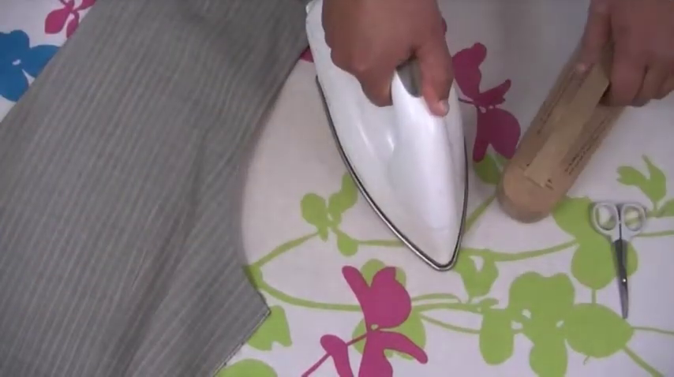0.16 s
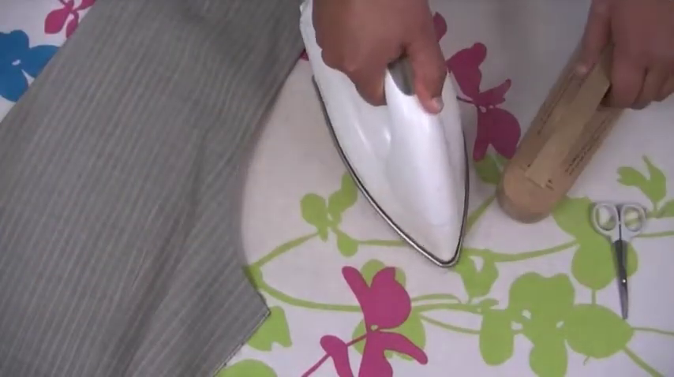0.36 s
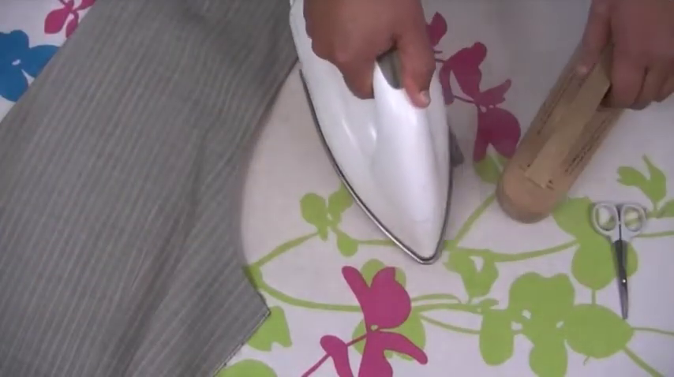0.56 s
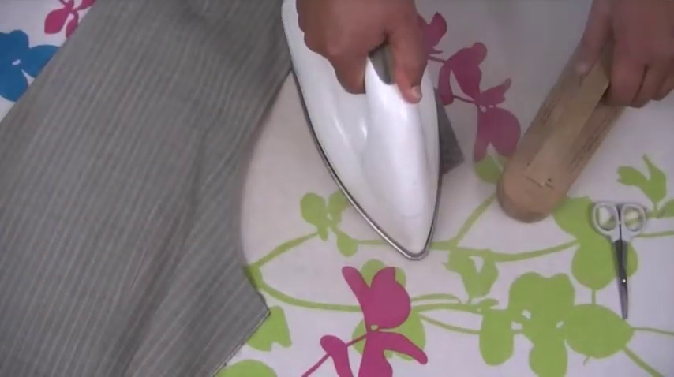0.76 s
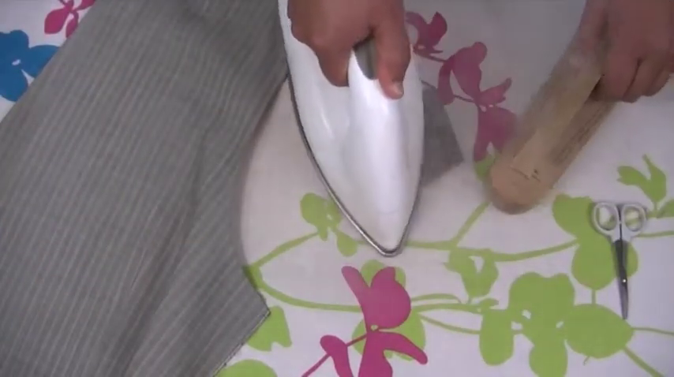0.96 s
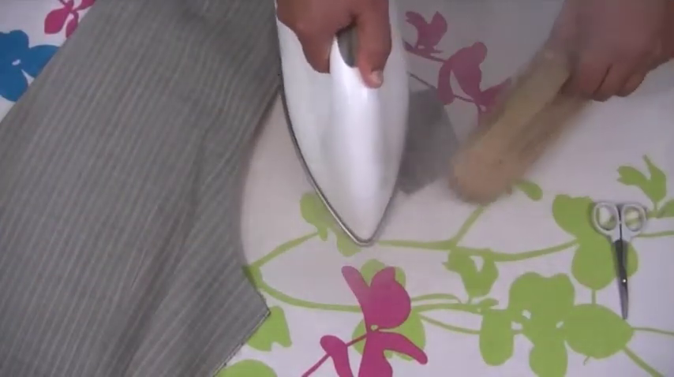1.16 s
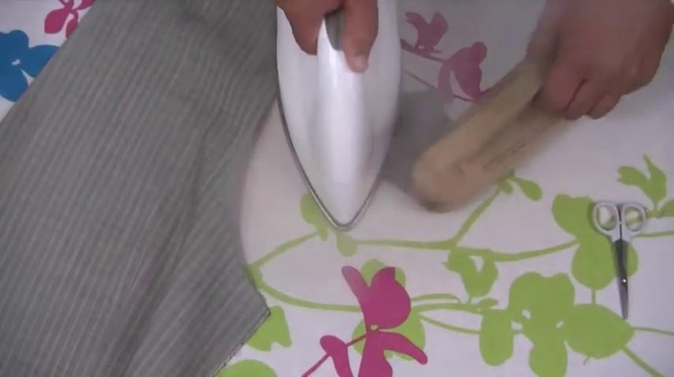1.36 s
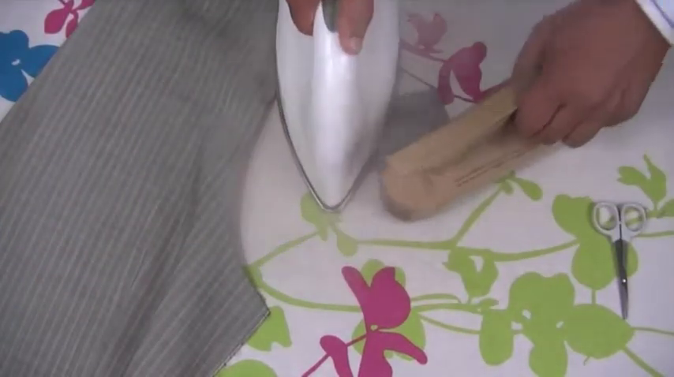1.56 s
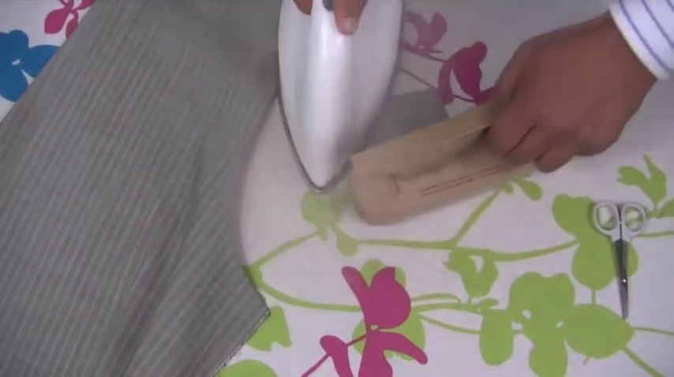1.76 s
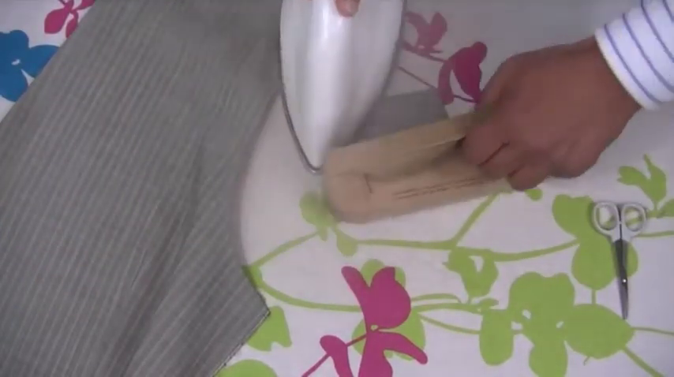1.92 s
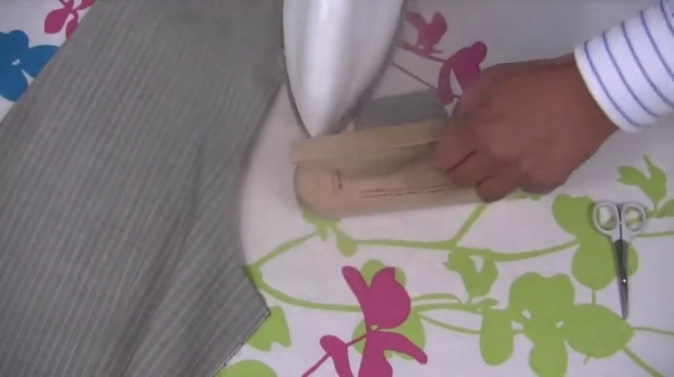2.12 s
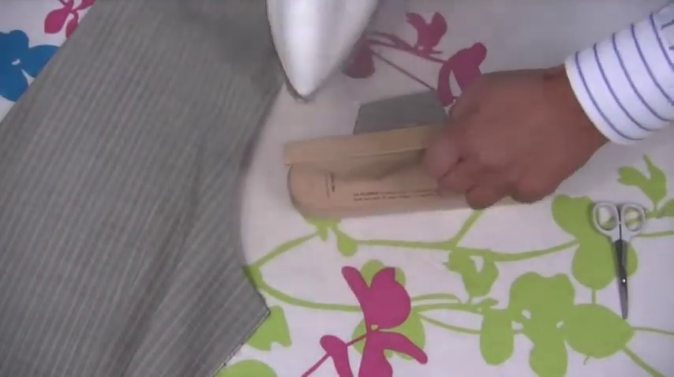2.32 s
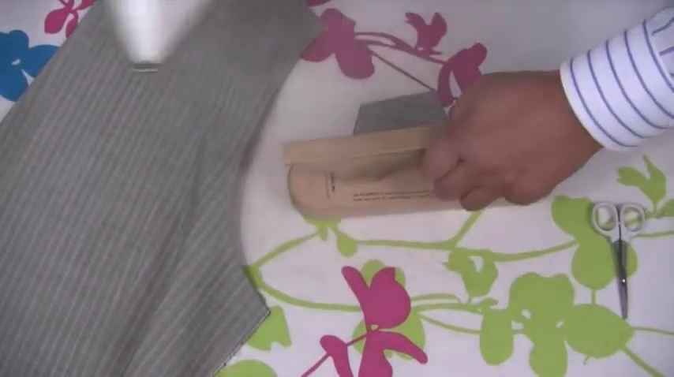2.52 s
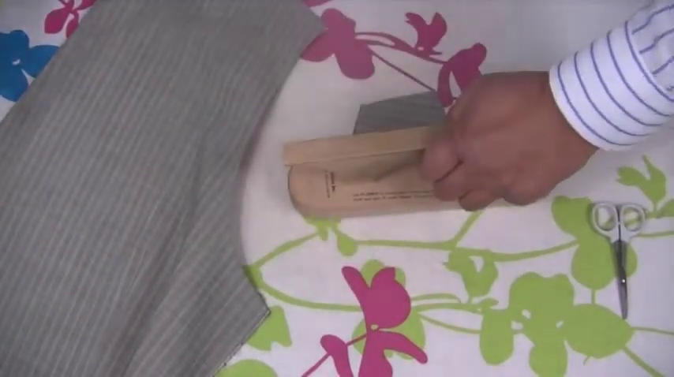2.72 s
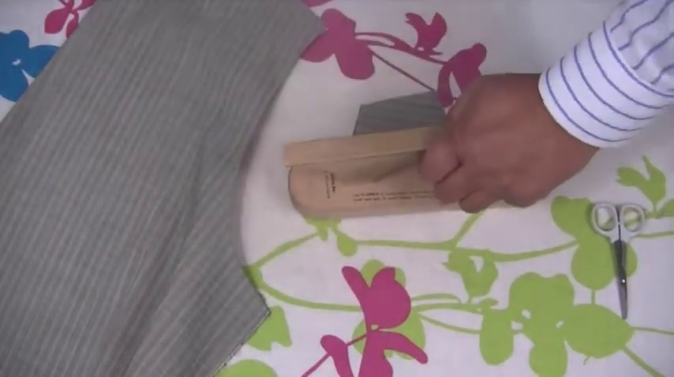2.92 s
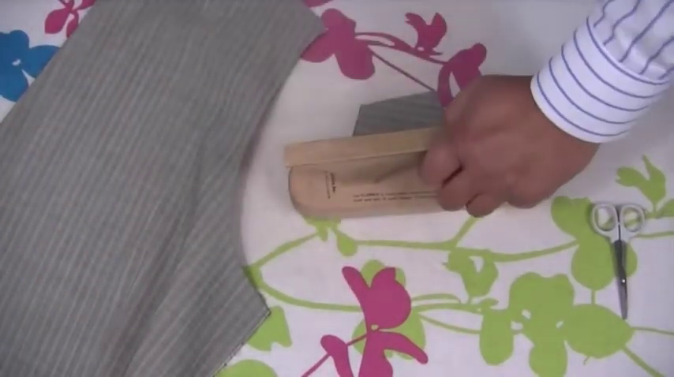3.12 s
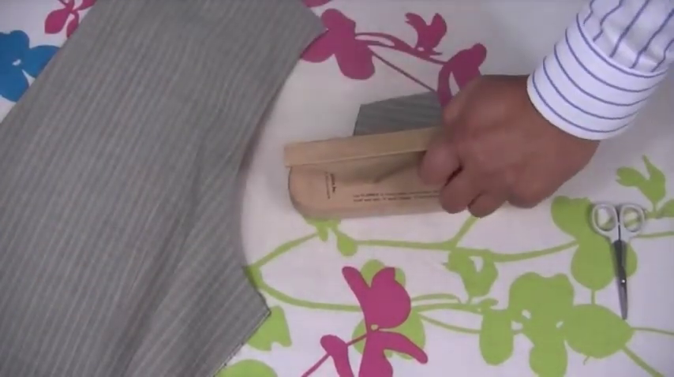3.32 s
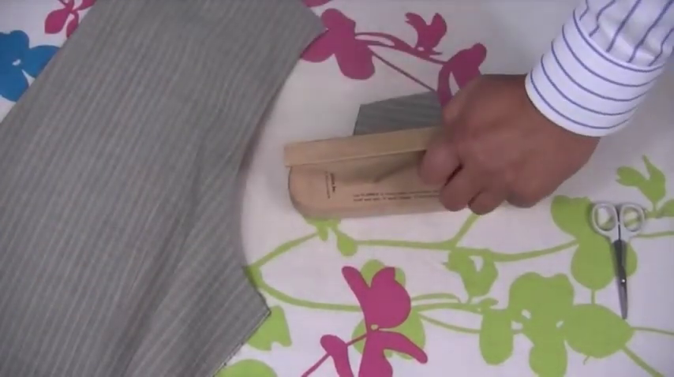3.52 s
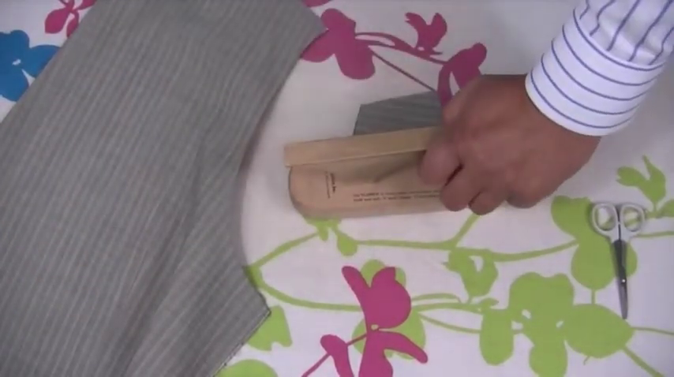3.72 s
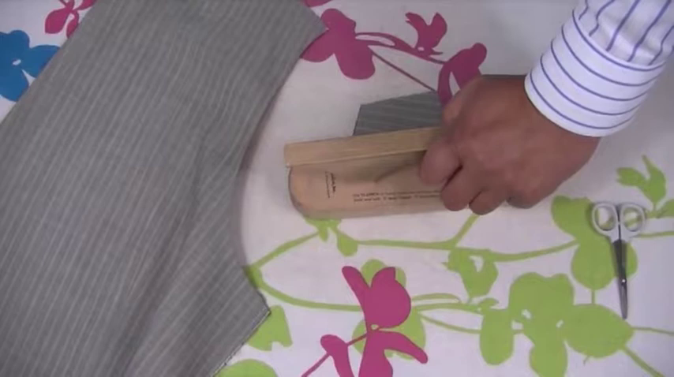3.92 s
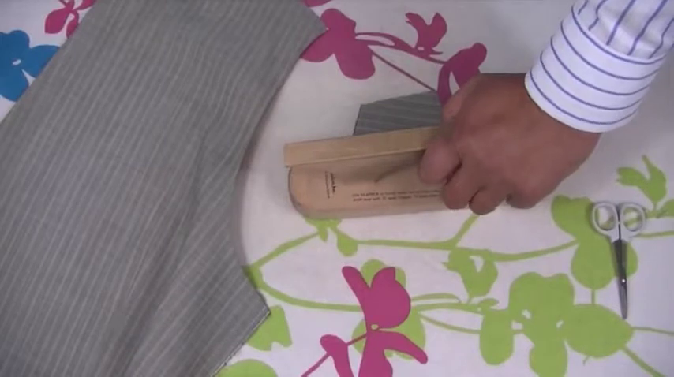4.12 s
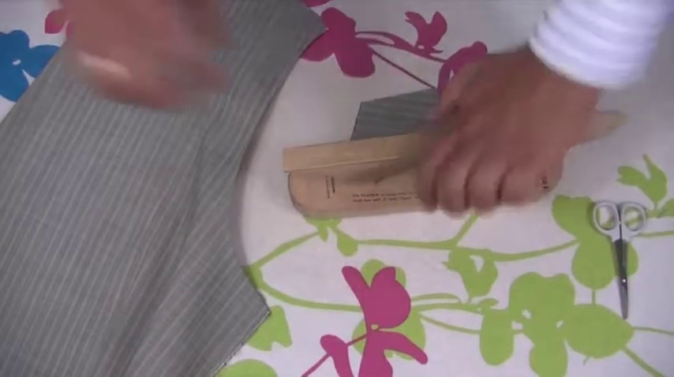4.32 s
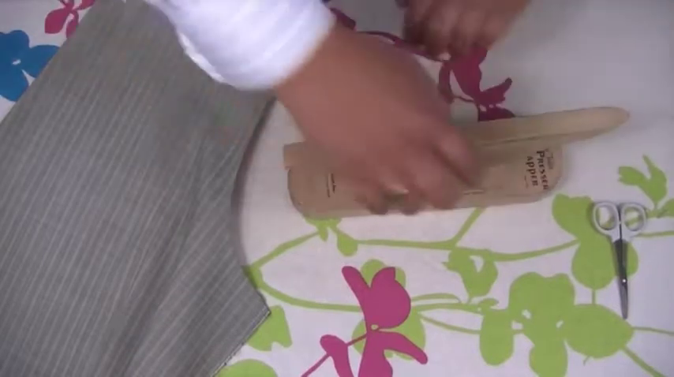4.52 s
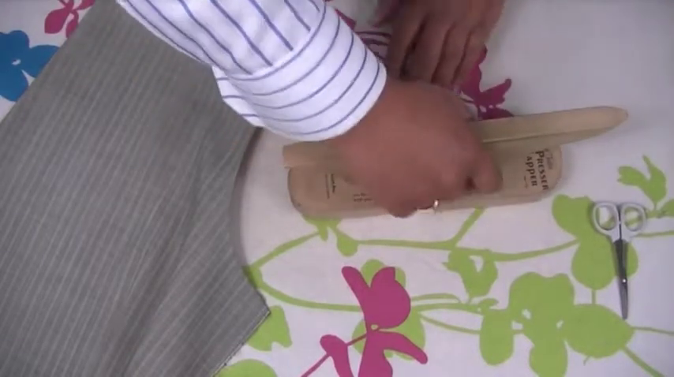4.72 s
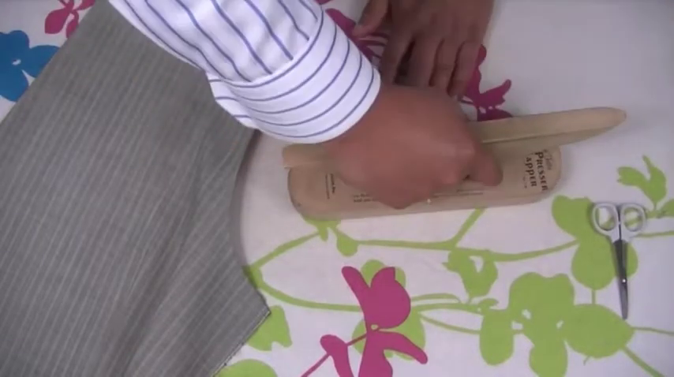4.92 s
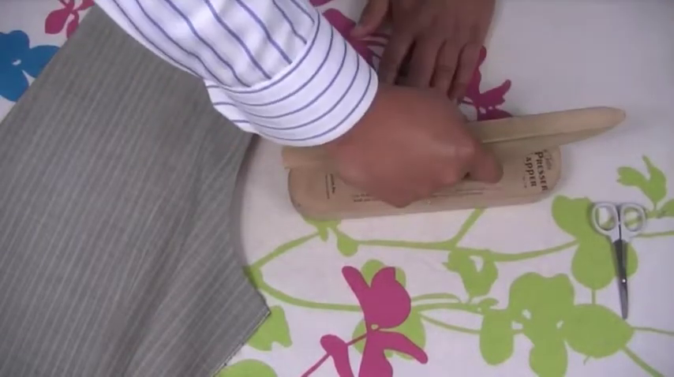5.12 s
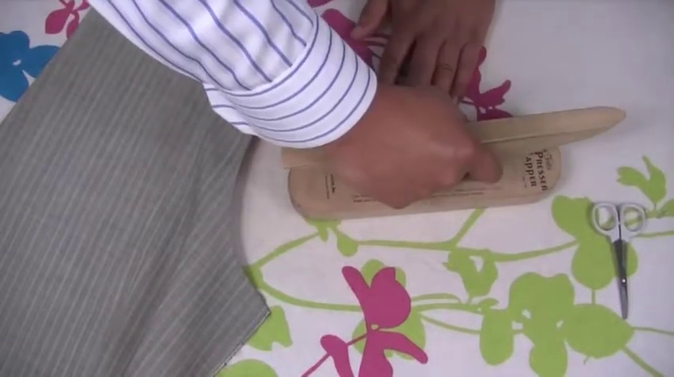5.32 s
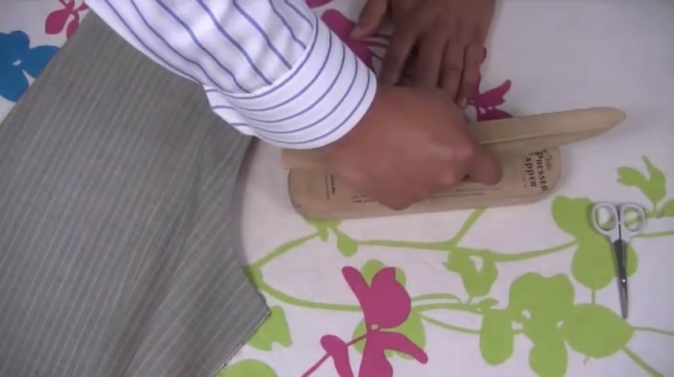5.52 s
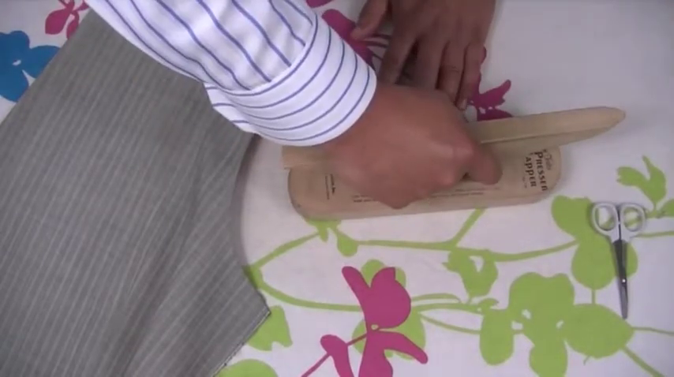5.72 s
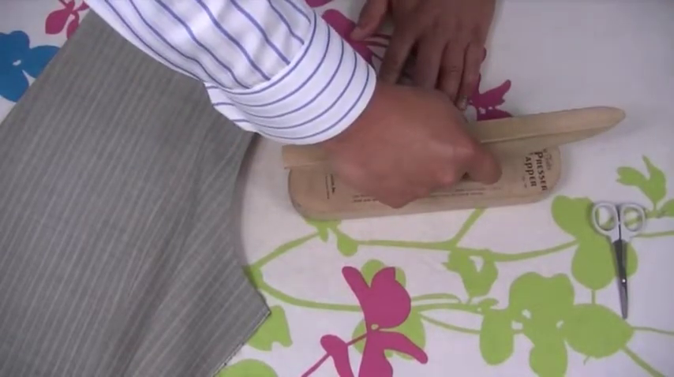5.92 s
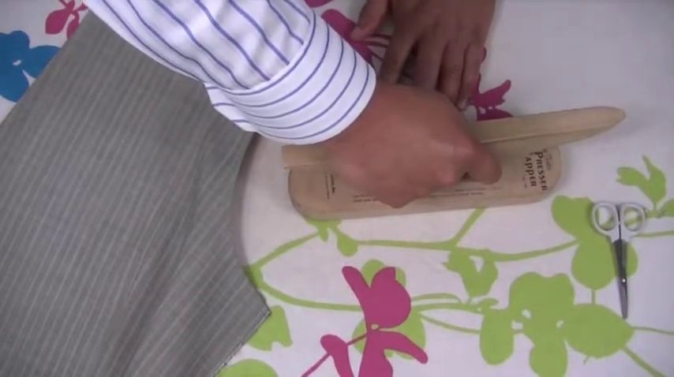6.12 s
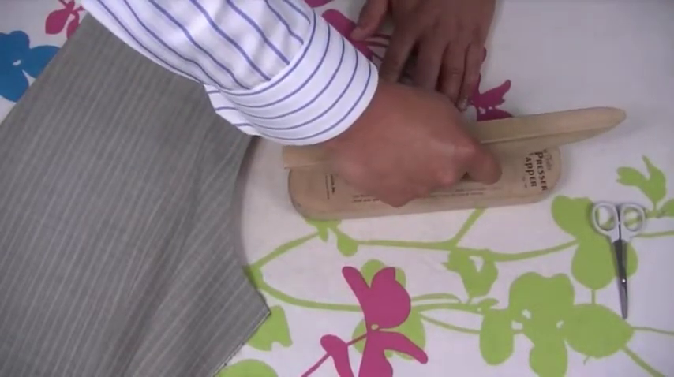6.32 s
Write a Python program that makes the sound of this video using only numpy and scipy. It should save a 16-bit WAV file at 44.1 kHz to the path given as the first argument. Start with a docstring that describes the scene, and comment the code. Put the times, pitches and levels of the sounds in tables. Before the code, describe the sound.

Strong steam hiss from an iron with two plastic clicks, sliding off and dying out, followed by soft wooden thuds, small taps and sleeve rustle.

```python
"""Steam iron stood up.

A steam iron hisses on cloth close by, slides off and stands further away, its steam dying out: shaped noise
through vent resonances. Button, ticking metal, wooden clapper on the padded board, the sleeves' closing scuff
and taps: struck decaying modes. Crackles, scrapes on the rest, soft low swells, rustling sleeves, room hum:
shaped noise; a thin high tone: a sine."""
import sys
import numpy as np
from scipy import signal
from scipy.io import wavfile
from scipy.ndimage import uniform_filter1d, map_coordinates

SR = 44100
rng = np.random.default_rng(int(sys.argv[2]) if len(sys.argv) > 2 else 0)


def wrap_up_sound(samples):
    """Save the sound to the file named by the first command line argument, as 16-bit audio."""
    columns = np.atleast_2d(samples).T
    # keep every value between -1 and 1, then stretch to whole-number steps
    tamed = np.clip(columns, -1, 1)
    steps = np.round(tamed * 32767).astype(np.int16)
    wavfile.write(sys.argv[1], SR, steps)


def boost(x):
    """Linear amplitude factor 10**(x/20) for a level x in decibels (scalar or array-like)."""
    u = np.asarray(x, float) / 20
    return 10 ** u


N = 285150
T = np.arange(N) / SR


def unit(x):
    """Scales to rms 1."""
    return x / np.sqrt(np.mean(x ** 2) + 1e-20)


def along(points, hz):
    """Interpolates (frequency [Hz], value) points on a log frequency axis."""
    f, v = np.transpose(points)
    return np.interp(np.log(hz + 1), np.log(f + 1), v)


def curves(rows):
    """One curve per column after the time; -120 before the first row, the last value held."""
    s, *cols = np.transpose(rows)
    return [np.interp(T, s, c, -120, c[-1]) for c in cols]


def wobble(rate_hz):
    """Smooth random curve through rate_hz normal knots a second."""
    knots = rng.standard_normal(int(N * rate_hz / SR) + 4)
    return map_coordinates(knots, [T * rate_hz])


def swell(s, half_s):
    """Bell-shaped gain, 1 at s, 1/e at half_s either side."""
    return np.exp(-((T - s) / half_s) ** 2)


def band_noise(low_hz, high_hz, length):
    """Band-passed noise of rms 1."""
    band = signal.butter(2, [low_hz, high_hz], "band", fs=SR, output="sos")
    return unit(signal.sosfilt(band, rng.standard_normal(length)))


def high_pass(x, order, hz):
    """High-pass filter."""
    return signal.sosfilt(signal.butter(order, hz, "high", fs=SR, output="sos"), x)


def rush(spectrum, alike, patchy_db, ripple_db, peaks=(), spit_db=0):
    """Stereo noise of rms 1: short patches of random gain, and a slow fine ripple from nearby reflections."""
    bursts_db = spit_db * rng.standard_normal(N // 100 + 1)  # droplets bursting
    raw = rng.standard_normal((2, N)) * boost(bursts_db.repeat(100)[:N])
    hz, _, z = signal.stft(raw.astype(np.float32), SR, nperseg=2048)
    chance = rng.standard_normal((2,) + z.shape[1:], np.float32)
    patches = uniform_filter1d(uniform_filter1d(chance[0], size=20, axis=0), size=3, axis=1)
    ripple = uniform_filter1d(uniform_filter1d(chance[1], size=2, axis=0), size=30, axis=1)
    db = along(spectrum, hz)
    for center_hz, width_hz, lift_db in peaks:
        db = db + lift_db / (1 + (2 * (hz - center_hz) / width_hz) ** 2)
    gain_db = db[:, None] + patchy_db * unit(patches)
    gain_db = gain_db + 1.6 * ripple_db * np.tanh(unit(ripple))
    turn = np.arccos(np.clip(along(alike, hz), -1, 1)) / 2  # likeness to mid/side angle
    mid_side = np.array([np.cos(turn), np.sin(turn)])[..., None]
    mid, side = signal.istft(z * boost(gain_db) * mid_side, nperseg=2048)[1][:, :N]
    return unit(np.array([mid + side, mid - side]))


def strike(track, s, db, modes, scuff_s, rough):
    """One blow, then a rough contact of t60 scuff_s, drive modes (frequency [Hz], level [dB], t60 [s])."""
    t = np.arange(SR // 6) / SR
    ring = 0
    for hz, level_db, t60 in modes:
        strength_db = level_db + rng.normal(0, 0.86)
        ring = ring + boost(strength_db - 60 * t / t60) * np.sin(2 * np.pi * hz * t)
    ring = ring * (1 - np.exp(-t / 0.0005))  # modes start to ring over 0.5 ms
    contact = rough * boost(-60 * t / scuff_s) * rng.standard_normal(len(t))
    contact[0] = 1
    ring = signal.fftconvolve(ring, contact)[:len(t)]
    track[round(s * SR):][:len(t)] += boost(db) * ring / np.abs(ring).max()


def louder(modes, db):
    """Raises every mode by db."""
    return [(hz, level_db + db, t60) for hz, level_db, t60 in modes]


# room air: (frequency [Hz], relative density [dB per Hz])
ROOM_SPECTRUM = [(15, -63), (25, -13.5), (70, -20), (130, -11), (227, -6), (422, -5), (457, -4), (567, -3),
                 (666, -3.5), (849, -5), (1110, -6), (1900, -11), (2360, -9), (9560, -23), (10400, -18),
                 (11200, -22.5), (15500, -23)]
# fuzzy steady lines in it: (frequency [Hz], width [Hz], lift [dB])
HUM_LINES = [(225, 30, 3), (685, 30, 6), (1015, 25, 5), (1093, 25, 7), (1480, 40, 7), (1592, 25, 5),
             (2290, 30, 5), (3010, 30, 5)]
# stereo of the room: (frequency [Hz], left-right likeness [-1..1])
ROOM_LIKENESS = [(60, 0.0092), (180, -0.3), (550, -0.73), (1650, -0.28), (4970, 0.096), (15000, 0.072)]
ROOM_DB = -58.5


def room():
    """Steady indoor air: noise with faint humming lines."""
    return boost(ROOM_DB) * rush(ROOM_SPECTRUM, ROOM_LIKENESS, 0.65, ripple_db=2.5, peaks=HUM_LINES)


# thin high tone: (start [s], end [s], frequency [Hz])
HIGH_TONE = (4.98, 6.06, 10697)


def whine():
    """A thin sine that comes and goes, wavering slightly in level and phase."""
    start_s, end_s, hz = HIGH_TONE
    on = np.clip(np.minimum(T - start_s, end_s - T) * 30, 0, 1)
    level = boost(-76 + 0.8 * wobble(12))
    return on * level * np.sin(2 * np.pi * hz * T + 0.2 * wobble(30))


# sleeve strokes: (start [s], full [s], fading [s], level [dB], end [s])
SLEEVE_STROKES = [(4.0, 4.393, 4.67, -55.5, 5.58), (6.323, 6.433, 6.37, -61.5, 6.7)]
# cloth colour: (frequency [Hz], relative density [dB per Hz])
CLOTH_SPECTRUM = [(30, -19), (150, 5.5), (600, 5), (2000, -10), (4200, 1.5), (5200, 6), (6000, 0),
                  (11000, 1), (15000, -6)]
RUSTLE_SWING_DB, STROKE_RANGE_DB = 1.5, 18  # unevenness; stroke ends relative to full


def sleeves():
    """Cloth brushing cloth: one long stroke that rises, holds and fades, then a short late one."""
    level = 0
    for start_s, full_s, fading_s, db, end_s in SLEEVE_STROKES:
        stroke_db = db - STROKE_RANGE_DB * np.array([1, 0, 0, 1])
        level = level + boost(np.interp(T, [start_s, full_s, fading_s, end_s], stroke_db, -120, -120))
    level = level * boost(RUSTLE_SWING_DB * wobble(14))
    return level * rush(CLOTH_SPECTRUM, ROOM_LIKENESS, 0.93, ripple_db=4.5, spit_db=2.0)


# room decay: (frequency [Hz], t60 [s])
WALL_DECAY = [(200, 0.3), (2000, 0.28), (10000, 0.06)]


def walls(x):
    """Diffuse room answer: a noise tail in which each frequency dies at its own speed."""
    hz, t, z = signal.stft(rng.standard_normal((2, SR // 2)), SR, nperseg=256)
    decay = boost(-60 * t / along(WALL_DECAY, hz)[:, None])
    tail = signal.istft(z * decay, SR, nperseg=256)[1]
    delayed = np.pad(x, (200, 0))[None]
    return signal.fftconvolve(delayed, tail / np.linalg.norm(tail[0]), axes=1)[:, :N]


# low swells: (time [s], half length [s], level [dB])
LOW_SWELL_TIMES = [(3.2, .025, -61), (3.303, .016, -51), (3.338, .022, -54), (3.56, .05, -63),
                   (3.735, .02, -63), (4.962, .016, -60)]
# their colour: (frequency [Hz], relative density [dB per Hz])
LOW_SWELL_SPECTRUM = [(150, -40), (215, -5), (285, -14), (340, 0), (400, -1), (500, -14), (800, -45)]


def low_swells():
    """Short soft swells of low noise around 350 Hz, some together with thuds."""
    level = sum(boost(db) * swell(s, half_s) for s, half_s, db in LOW_SWELL_TIMES)
    return level * rush(LOW_SWELL_SPECTRUM, [(300, 0.9)], 0.5, ripple_db=0.5)


# heel drags on the rest: (time [s], half length [s], level [dB])
SCRAPE_TIMES = [(3.465, 0.027, -61), (3.545, 0.027, -54), (3.63, 0.038, -53), (3.876, 0.07, -64),
                (4.062, 0.094, -56.5)]
# heel colour: (frequency [Hz], relative density [dB per Hz])
HEEL_SPECTRUM = [(250, -54), (550, 1), (700, 0), (950, 2), (1300, 0), (2500, -34)]
# stereo of the iron: (frequency [Hz], left-right likeness [-1..1])
IRON_LIKENESS = [(60, 0.23), (150, 0.83), (380, 0.93), (950, 0.73), (2380, 0.87), (5980, 0.6), (9500, 0.53),
                 (15000, 0.25)]


def scrapes():
    """The iron's heel drags on its rest: short swells of grainy noise."""
    level = sum(boost(db) * swell(s, half_s) for s, half_s, db in SCRAPE_TIMES)
    grain = rush(HEEL_SPECTRUM, IRON_LIKENESS, 1.5, ripple_db=3.0, spit_db=2.5)
    return level * boost(3.0 * wobble(40)) * grain


# dry crackles: (time [s], level [dB], centre [Hz], width [octaves], rise [s]), before the high-pass
CRACKLE_TIMES = [(4.531, -50.5, 5460, 0.7, 0.0042), (4.546, -53, 4940, 0.83, .006),
                 (5.325, -60, 7000, 1.8, 0.0016), (5.325, -56.5, 2800, 1.4, 0.0033),
                 (6.05, -66, 3500, 0.39, .005), (6.362, -55.5, 3500, 1.3, 0.0018),
                 (4.049, -48, 3500, 3, 0.0037), (6.419, -58.5, 2000, 2.1, 0.014)]


def crackles():
    """Dry crackles without a ring: band noise that rises, then decays."""
    x = np.zeros(N + SR)
    t = T[:SR // 10]
    for s, db, hz, octaves, rise_s in CRACKLE_TIMES:
        grit = band_noise(hz * 2 ** (-octaves / 2), hz * 2 ** (octaves / 2), len(t))
        envelope = t / rise_s * np.exp(1 - t / rise_s)
        x[round(s * SR):][:len(t)] += boost(db) * grit * envelope
    return x


# small taps: (time [s], peak before the high-pass [dB], frequency [Hz], t60 [s])
TAP_TIMES = [(3.426, -41, 1050, 0.034), (3.62, -48, 950, 0.045), (3.655, -55, 805, .02),
             (3.838, -45.5, 560, 0.019), (4.112, -45, 1100, 0.023), (4.341, -41, 1420, 0.015),
             (4.518, -41, 1480, 0.012), (4.8228, -42, 490, 0.035), (4.84, -48, 530, .05),
             (4.8865, -45, 1000, 0.022), (5.065, -51, 2220, 0.0086), (6.303, -43, 1690, 0.008)]
# modes of a tap: (multiple of its frequency, level [dB])
TAP_PARTIALS = [(1, 0), (1.65, -9), (2.15, -10)]


def taps():
    """Small taps: three inharmonic modes with one decay."""
    x = np.zeros(N + SR)
    for s, db, hz, t60 in TAP_TIMES:
        modes = [(hz * multiple, level_db, t60) for multiple, level_db in TAP_PARTIALS]
        strike(x, s, db, modes, scuff_s=0.006, rough=0.04)
    return x


# clapper, and at the end the sleeves' closing scuff: (time [s], peak before the high-pass [dB], board [dB],
# hardness [dB per octave], scuff t60 [s])
CLAPPER_THUDS = [(2.447, -44.5, -5, -15, 0.11), (3.192, -49, 0, -9, 0.066), (3.281, -38, -10, -3, 0.1),
                 (3.527, -51, -18, -15, 0.077), (4.407, -52, -7, -10, 0.031), (4.443, -48, -5, -3, 0.072),
                 (4.543, -46.5, 1, -15, 0.028), (4.826, -43, 6, -2, 0.01), (4.837, -47, -6, 6, 0.043),
                 (4.865, -48, -1, 6, .03), (4.914, -49, 8, -5, .03), (6.422, -55, -14, 6, 0.3),
                 (6.439, -56, -7, -10, .12)]
# wood modes: (frequency [Hz], level [dB], t60 [s])
WOOD_MODES = [(220, -2.5, 0.038), (360, -2, 0.045), (476, -2, 0.028), (540, 0, 0.024), (730, -1, 0.018),
              (1080, -7, 0.015), (1900, -12, 0.011), (3070, -21, 0.0079)]
# ironing board modes: (frequency [Hz], level [dB], t60 [s])
BOARD_MODES = [(60.4, -9, 0.091), (146, 1.5, 0.087)]


def clapper():
    """A wooden clapper set down on the padded board, and the sleeves' closing scuff: wood and board modes ring;
    harder contact is brighter."""
    x = np.zeros(N + SR)
    for s, db, board_db, hard_db, scuff_s in CLAPPER_THUDS:
        wood = [(hz, level_db + hard_db * np.log2(hz / 370), t60) for hz, level_db, t60 in WOOD_MODES]
        strike(x, s, db, wood + louder(BOARD_MODES, board_db), scuff_s, rough=0.78)
    return x


# metal ticks: (time [s], ring peak before the high-pass [dB], lift over 4 kHz [dB])
METAL_TICKS = [(4.0503, -35, 4), (4.056, -31, -7), (4.071, -42.5, -3)]
# metal modes: (frequency [Hz], level [dB], t60 [s])
METAL_MODES = [(775, -20, 0.03), (1100, -9, 0.019), (1400, -8, .018), (1880, -7, 0.02), (2300, -10, .012),
               (2910, 0, 0.055), (3900, -13, .01), (5020, -12, 0.048), (5150, -5, 0.022), (5680, -3, 0.014),
               (7900, -15, .01), (8750, -14, 0.012), (10000, -15, .01), (11600, -17, .008)]
SNAP_DB, SNAP_T60_S = -23, 0.012  # crack: gain relative to the ring peak; decay


def ticks():
    """Ticking metal: ringing modes under a broadband crack of differenced noise."""
    x = np.zeros(N + SR)
    t = T[:SR // 50]
    for s, db, bright_db in METAL_TICKS:
        modes = [(hz, level_db + bright_db * (hz > 4000), t60) for hz, level_db, t60 in METAL_MODES]
        strike(x, s, db, modes, scuff_s=0.012, rough=0.093)
        crack = np.diff(rng.standard_normal(len(t) + 1))
        x[round(s * SR):][:len(t)] += boost(db + SNAP_DB - 60 * t / SNAP_T60_S) * crack
    return x


# button clicks: (time [s], peak before the high-passes [dB], shell lift [dB])
BUTTON_CLICKS = [(0.0447, -20, 9), (.0525, -24, 0), (0.1629, -9, -1), (.1682, -20, 2)]
# button modes: (frequency [Hz], level [dB], t60 [s])
PLASTIC_MODES = [(1825, 16, 0.031), (2070, 15, 0.028), (1600, 8, 0.013)]
# body of the iron: (frequency [Hz], level [dB], t60 [s])
SHELL_MODES = [(440, 0, 0.035), (560, 1, 0.016), (700, 4, 0.022), (950, 3, 0.028), (1180, 2, .02),
               (1390, 4, 0.016)]


def button():
    """The button clicks: plastic modes and a knock of the iron's shell."""
    x = np.zeros(N + SR)
    for s, db, knock_db in BUTTON_CLICKS:
        strike(x, s, db, PLASTIC_MODES + louder(SHELL_MODES, knock_db), scuff_s=0.006, rough=0.1)
    return high_pass(x, 3, 330)


def knocks():
    """All short contacts, kept free of deep bass."""
    x = button() + ticks() + clapper() + taps() + crackles()
    return high_pass(x[:N], 3, 190)


# single vents flaring up: (time [s], half length [s], level [dB], centre [Hz])
VENT_SURGES = [(2.123, .04, -47, 2850), (2.25, 0.044, -44, 2900), (2.308, 0.027, -41.5, 3200),
               (2.42, 0.035, -52, 3420), (2.52, 0.02, -38, 2180), (2.57, .02, -40.5, 3420),
               (2.63, 0.051, -36, 2900), (2.753, 0.036, -39.5, 2740), (2.844, 0.055, -42, 2350),
               (2.91, 0.027, -44, 3500)]
SURGE_WIDTH_HZ = 278


def surges():
    """Single vents flare up while the iron is carried off: narrow noise bands in bell-shaped swells."""
    x = np.zeros(N)
    for s, half_s, db, hz in VENT_SURGES:
        vent = band_noise(hz - SURGE_WIDTH_HZ / 2, hz + SURGE_WIDTH_HZ / 2, N)
        x += boost(db) * swell(s, half_s) * vent
    return x


# 3 kHz mode of the standing iron: (time [s], level [dB])
SINGING_MID = [(2.99, -68), (3.16, -56), (3.3, -70), (3.5, -57), (3.85, -54), (3.98, -61), (4.4, -64),
               (4.5, -72), (5.1, -74), (5.5, -73), (6.47, -85)]
# its 5.7 kHz mode: (time [s], level [dB])
SINGING_HIGH = [(2.99, -79), (3.25, -57), (3.5, -69), (4.2, -75), (6.47, -100)]
# its mode near 1.5 kHz: (time [s], level [dB])
SINGING_LOW = [(2.99, -57), (3.6, -64), (4.3, -78), (5., -73), (5.6, -77), (6.47, -86)]


def singing():
    """Three vent modes of the standing iron: narrow noise bands."""
    colour = [(2500, -43), (2850, -10), (2920, 3), (3030, 4), (3110, -12), (3500, -50)]
    x = boost(curves(SINGING_MID)[0]) * rush(colour, IRON_LIKENESS, 1.0, ripple_db=2.0)
    for rows, hz in ((SINGING_HIGH, 5700), (SINGING_LOW, 1530)):
        colour = [(hz - 300, -50), (hz - 50, 0), (hz + 50, 0), (hz + 300, -50)]
        x += boost(curves(rows)[0]) * rush(colour, IRON_LIKENESS, 1.0, ripple_db=2.0)
    return x


# 3.5 kHz vent mode: (time [s], level over the jet [dB])
WHISTLE_LEVEL = [(0, -7.5), (.3, -8.5), (.33, -1), (.59, 1.5), (.64, -0.5), (.8, -0.5), (.92, 1),
                 (.96, -3.5), (1.4, -6.5), (2.2, -7), (2.9, -7.5), (3.04, -10.5), (4.3, -11), (6.47, -12)]
# random level swing of the whistle: (time [s], swing [dB], its sign only flips the random curve)
WHISTLE_SWING = [(0, -1), (2., 1), (2.3, 2), (6.47, 1.5)]


def whistle(jet_db):
    """A 3.5 kHz vent mode that follows the jet: a narrow noise band, wavering at random."""
    colour = [(2500, -63.5), (3230, -7), (3530, 0), (3820, -6), (5000, -65)]
    swing_db = curves(WHISTLE_SWING)[0] * wobble(12)
    level_db = jet_db + curves(WHISTLE_LEVEL)[0] + swing_db
    return boost(level_db) * rush(colour, IRON_LIKENESS, 1.0, ripple_db=3.0)


# water in the 1.3 kHz vent: (time [s], half length [s], level [dB])
WATER_SLUGS = [(.09, 0.16, -47), (2.35, 0.077, -51.5), (2.706, 0.062, -50), (3.12, 0.11, -66)]
FULL_JET_DB = -30  # reference jet level
GURGLE_DB, GURGLE_DB_PER_JET_DB, GURGLE_SWING_DB = -49.5, 0.93, 1  # level at the reference jet; slope; swing


def gurgle(jet_db):
    """A 1.3 kHz vent mode that simmers with the jet and swells as water slugs pass."""
    colour = [(800, -75), (1150, 5.0), (1330, 9.0), (1520, 1.0), (2100, -57)]
    follow_db = GURGLE_DB_PER_JET_DB * (jet_db - FULL_JET_DB)
    simmer = boost(GURGLE_DB + follow_db + GURGLE_SWING_DB * wobble(7.8))
    slugs = sum(boost(db) * swell(s, half_s) for s, half_s, db in WATER_SLUGS)
    return (simmer + slugs) * rush(colour, IRON_LIKENESS, 1.0, ripple_db=4.0)


# low blow, on the board and standing: (frequency [Hz], relative density [dB per Hz])
BLOW_SPECTRA = [
    [(24, -60), (40, -50), (130, -44), (215, -11.5), (301, -8.5), (433, -5), (651, -5.5), (1090, -11.5),
     (1270, -3.5), (1500, -14), (1950, 2), (3300, -120)],
    [(24, -61), (40, -31), (107, -44), (209, -2), (270, -15), (355, -1.5), (503, -6.5), (622, -8.5),
     (781, -11), (923, -4.5), (1500, -25), (1950, -34), (3300, -120)],
]
BLOW_DB, BLOW_DB_PER_JET_DB = -49, 0.75  # level at the reference jet; slope


def blow(jet_db, lift):
    """Low rush that follows the jet and changes colour as the iron is stood up."""
    standing = np.clip(lift - 1, 0, 1)
    x = np.sqrt(1 - standing) * rush(BLOW_SPECTRA[0], IRON_LIKENESS, 0.98, ripple_db=3.5)
    x += np.sqrt(standing) * rush(BLOW_SPECTRA[1], IRON_LIKENESS, 0.49, ripple_db=4.0, spit_db=0.47)
    follow_db = BLOW_DB_PER_JET_DB * (jet_db - FULL_JET_DB)
    return boost(BLOW_DB + follow_db + 1.6 * wobble(7)) * x


# fizz, early and late: (frequency [Hz], relative density [dB per Hz])
FIZZ_SPECTRA = [
    [(3240, -57.5), (5500, 5), (6020, -25), (6630, 2), (8090, 0), (9140, 8), (11000, 2), (12300, -8.5),
     (13700, -5.5), (14600, -12), (15500, -27)],
    [(3240, -39), (5500, -5.5), (6050, -18), (6830, -5.5), (7200, -6), (7520, -1.5), (10600, -5.5),
     (11900, -13.5), (13800, -19), (14900, -32), (15500, -29)],
]


def fizz(lift):
    """Treble fizz: spitting noise, crossfaded from early to late colour as the iron is lifted."""
    late = np.clip(lift, 0, 1)
    early_peaks = [(8250, 240, 3.0)]
    late_peaks = [(7320, 230, 5.2), (8800, 280, 3.0), (11500, 190, 3.1)]
    x = np.sqrt(1 - late) * rush(FIZZ_SPECTRA[0], IRON_LIKENESS, 0.51, 6.0, early_peaks, spit_db=0.64)
    x += np.sqrt(late) * rush(FIZZ_SPECTRA[1], IRON_LIKENESS, 0.83, 3.0, late_peaks, spit_db=1.0)
    return x


# jet colour per posture: (frequency [Hz], relative density [dB per Hz])
JET_SPECTRA = [
    [(590, -40.5), (1000, -17.5), (1210, -25.5), (1740, -13.5), (2310, -6.5), (2510, -9), (3050, -7),
     (3480, -10), (4160, -14), (7000, -22), (9100, -54), (15400, -120)],
    [(590, -56), (1000, -19), (1300, -25), (1730, -13.5), (2190, -4.5), (2840, -1), (3360, -0.5),
     (4260, -11.5), (6100, -15.5), (7000, -25.5), (9100, -38), (15400, -120)],
    [(590, -38), (1000, -10.5), (1540, -5), (1950, -9), (2220, -5.5), (2740, -6), (3000, -5.5),
     (5760, -14.5), (6150, -21), (7000, -20), (9100, -45), (15400, -120)],
]
# steam channel resonances per posture: (frequency [Hz], width [Hz], lift over the jet [dB])
VENT_PEAKS = [
    [(2360, 93, -1), (2660, 160, 0), (3580, 170, -13), (3760, 60, 5), (4600, 900, 4), (6480, 200, 9)],
    [(1300, 150, 8), (2300, 300, 4), (2840, 60, 5), (3290, 70, 5), (3560, 300, -12), (4530, 150, 4)],
    [(1586, 200, 6), (2300, 210, 4), (2946, 110, 8), (3600, 100, 2), (4560, 190, 4), (5690, 150, 4)],
]


def jet(lift):
    """Steam jet through the vents, whose tuning crossfades between three postures."""
    x = 0
    for k in range(3):
        share = np.sqrt(np.clip(1 - np.abs(lift - k), 0, 1))
        x = x + share * rush(JET_SPECTRA[k], IRON_LIKENESS, 0.22, 3.5, VENT_PEAKS[k], spit_db=1.0)
    return x


# steam flow: (time [s], jet [dB], treble fizz [dB])
STEAM_FLOW = [(0.0, -30, -34.5), (.2, -27.5, -33), (.38, -28, -32.5), (.55, -25.5, -31.5),
              (.76, -29.5, -34), (1.23, -31, -35.5), (1.45, -33.5, -36.5), (2.19, -37, -41.5),
              (2.35, -35, -44), (2.43, -37.5, -43.5), (2.5, -36.5, -45.5), (2.55, -38, -44.5),
              (2.66, -37, -47.5), (2.79, -37.5, -47), (2.96, -39.5, -52), (3.0, -43.5, -52.5),
              (3.16, -42, -54.5), (3.35, -45, -58), (4.0, -53, -63), (4.5, -54.5, -64), (5.1, -59.5, -74),
              (5.6, -66.5, -79), (6.47, -98, -75.5)]
# lift: (time [s], posture [0 pressed, 1 sliding, 2 standing; the jet weakens beyond 2])
IRON_POSTURE = [(0, 0.042), (.9, 0.22), (1.4, 1.087), (2.95, 1.02), (2.99, 2), (6.47, 2.74)]
# where the iron is: (time [s], left minus right [dB])
IRON_PAN = [(0, -0.5), (1.9, 0), (2.6, 1), (3.05, 2.5), (4.3, 1.5), (5.6, 0), (6.47, 1)]


def steam():
    """The iron's steam: jet, fizz, blow and vent modes, kept free of deep bass and panned with the iron."""
    jet_db, fizz_db = curves(STEAM_FLOW)
    lift, = curves(IRON_POSTURE)
    sputter = wobble(17)  # water reaches the hot plate unevenly
    x = boost(jet_db + 0.35 * sputter) * jet(lift)
    x += boost(fizz_db + 0.12 * sputter) * fizz(lift)
    x += blow(jet_db, lift) + gurgle(jet_db) + whistle(jet_db) + singing() + surges()
    x = high_pass(x, 2, 110)
    pan_db, = curves(IRON_PAN)
    return x * boost(np.array([pan_db, -pan_db]) / 2)


def scene():
    """All sources together; the knocks also excite the room."""
    hits = knocks()
    background = room() + whine() + sleeves()
    return background + boost(-12) * walls(hits) + low_swells() + scrapes() + hits + steam()


def band_limit(x):
    """A steep low-pass at the top of the band."""
    return signal.sosfilt(signal.butter(12, 15670, fs=SR, output="sos"), x)


def record(dry):
    """Passes the finished mix on at its own level."""
    return band_limit(dry)


dry = scene()
out = record(dry)
wrap_up_sound(out)
```